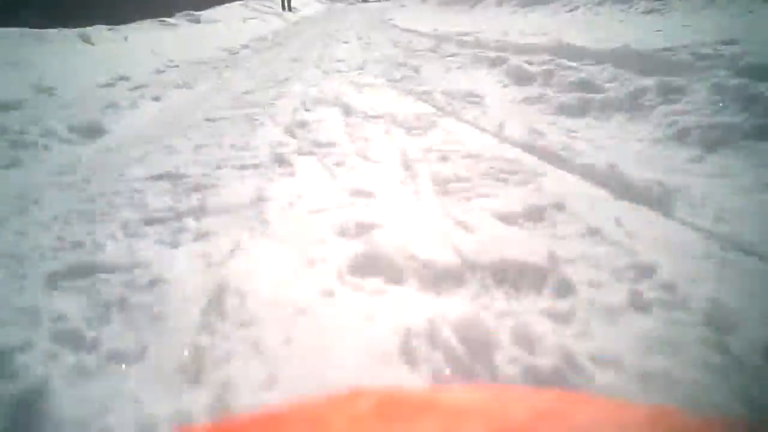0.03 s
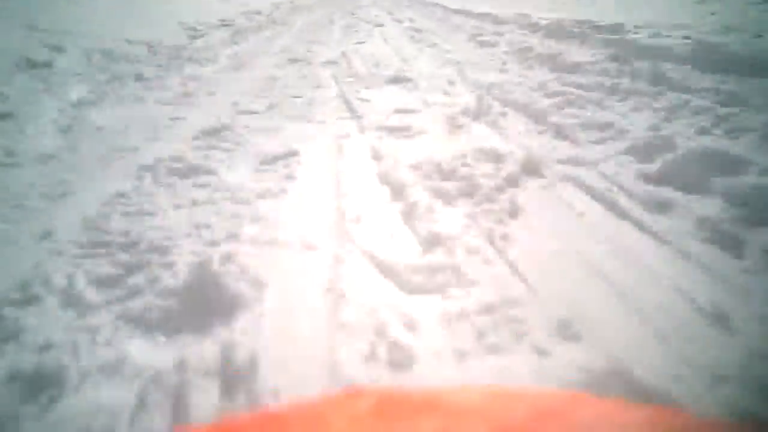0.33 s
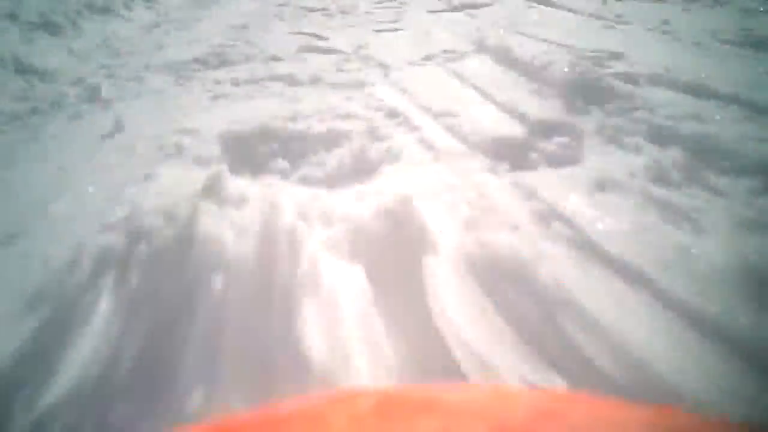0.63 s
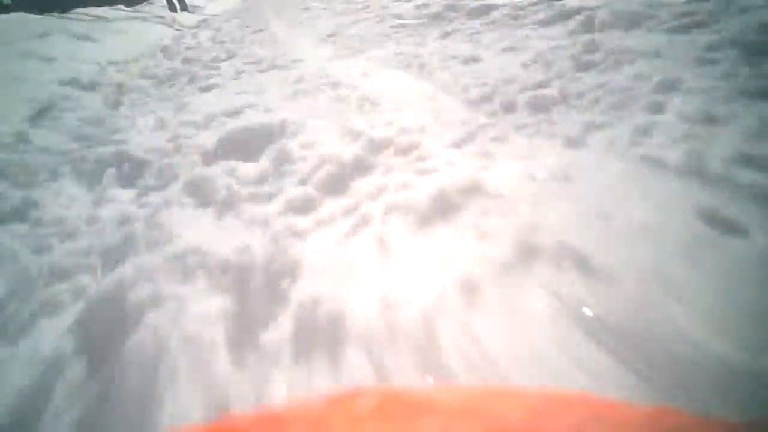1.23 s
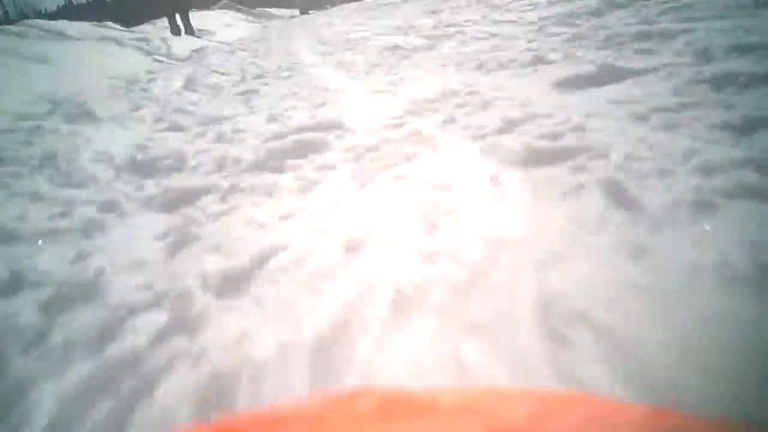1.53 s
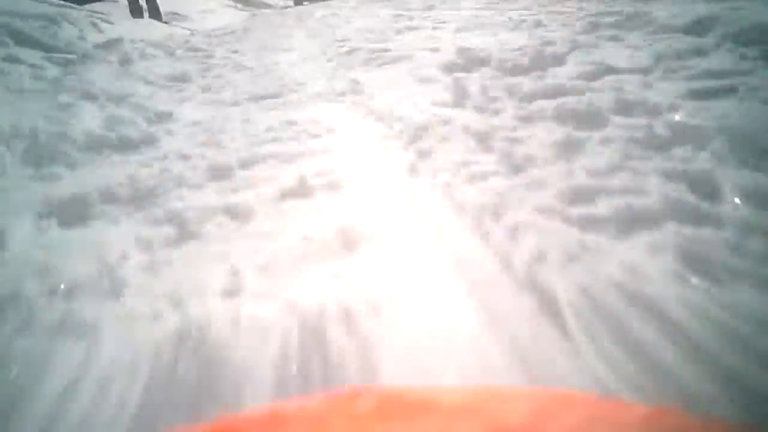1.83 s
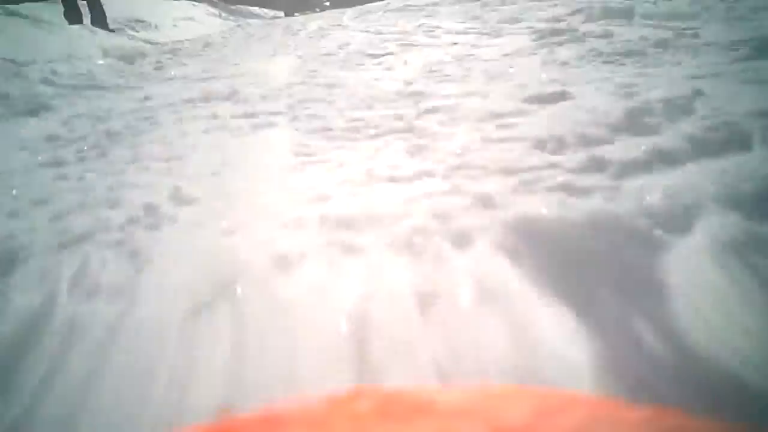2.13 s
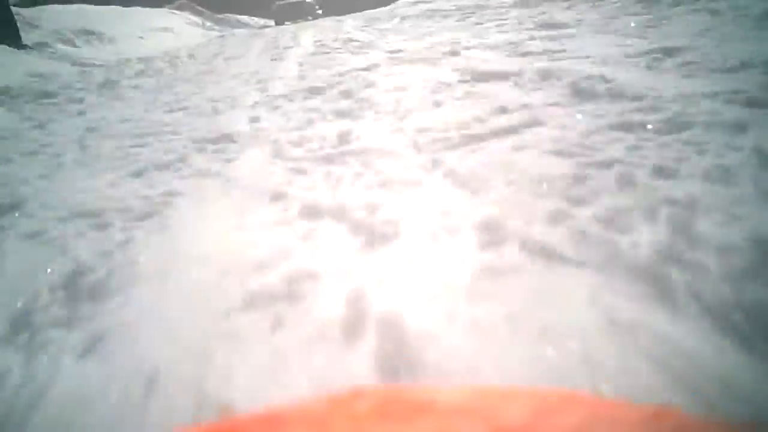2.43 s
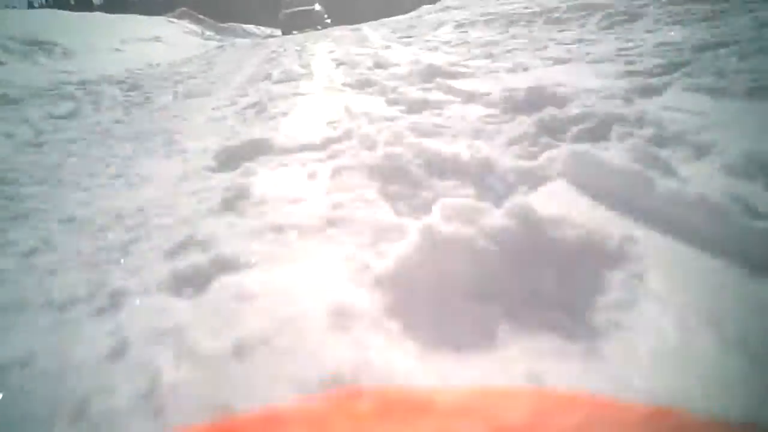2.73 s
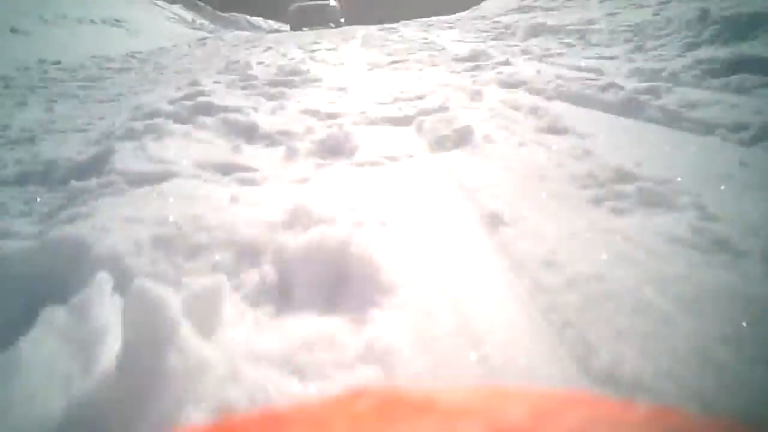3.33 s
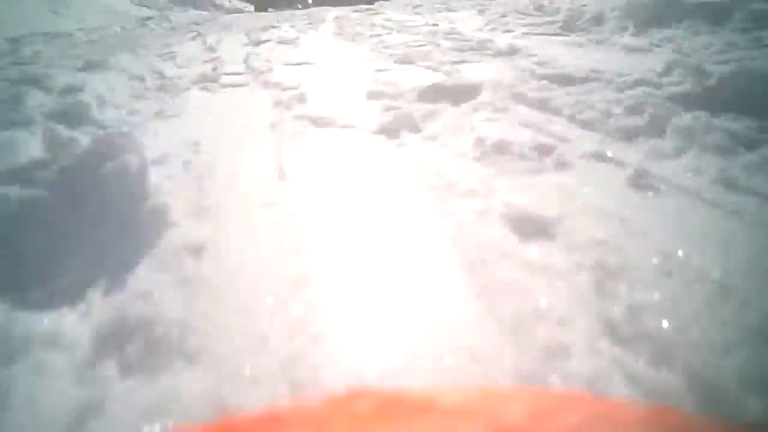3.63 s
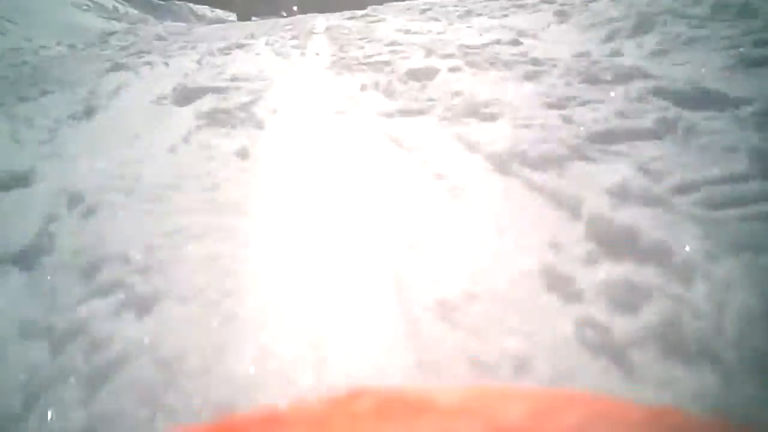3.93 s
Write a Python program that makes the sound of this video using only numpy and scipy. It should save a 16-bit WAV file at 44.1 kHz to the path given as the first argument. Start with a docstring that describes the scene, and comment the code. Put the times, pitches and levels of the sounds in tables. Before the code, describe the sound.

A model aircraft scrapes over rough snow, heard from its hull. At first there is only rushing wind with a fluttering whistle and low buffeting. From about 0.7 seconds the belly strikes ridges in short gritty scrapes, with crust cracks, hollow ticks and small knocks. The wind sinks in pitch and fades by 3.5 seconds. From around 2.3 seconds a light glide builds, ticking and bumping until 4 seconds.

```python
"""A light model aircraft skims over rough snow, heard from its hull.
Wind rushes past with a fluttering, whistling upper edge that sinks in pitch as it fades. The belly
strikes ridges in short gritty scrapes that crack the crust, then settles into a steady glide.
Hard crumbs tick on the hollow hull and the bigger bumps set the airframe ringing."""
import sys
import numpy as np
from scipy import signal
from scipy.fft import rfft, irfft, next_fast_len
from scipy.io import wavfile
from scipy.ndimage import uniform_filter1d, map_coordinates

SR = 44100
rng = np.random.default_rng(int(sys.argv[2]) if len(sys.argv) > 2 else 0)


def to_wav(s):
    """Save 16-bit WAV."""
    ch = np.atleast_2d(s).T  # columns
    pcm = np.round(np.clip(ch, -1, 1) * 32767)  # PCM
    wavfile.write(sys.argv[1], SR, pcm.astype(np.int16))


N = 176400
T = np.arange(N) / SR
CLUMPS_PER_S, CLUMP_DB = 160, 1

# snow hiss spectrum: freq_hz, gain_db
HISS_COLOUR = [(2000, -9), (3000, -2.5), (3500, -9), (4100, 0), (4600, 4.5), (5100, -5), (5600, -9.5),
               (6300, -3), (6800, -7), (7250, -1.5), (8000, -12.5), (8900, -16), (9650, -6.5),
               (10700, -10.5), (11500, -11), (13000, -12.5), (16000, -23)]


def amp(db):
    """Decibels to gain."""
    return 10 ** (np.asarray(db) / 20)


def unit(x):
    """Scale to rms 1."""
    return x / np.sqrt(np.mean(x ** 2) + 1e-20)


def log_curve(rows, freq):
    """Interpolate (freq, value) rows on a log axis."""
    knots, values = np.transpose(rows)
    return np.interp(np.log(freq + 1e-6), np.log(knots), values)


def curve(rows, t=T):
    """Interpolate (time_s, value) rows."""
    return np.interp(t, *np.transpose(rows))


def wobble(knots_per_s):
    """Smooth random curve."""
    return map_coordinates(rng.standard_normal(int(N * knots_per_s / SR) + 4), [T * knots_per_s])


def coloured(x, colour):
    """Minimum-phase filter from (freq_hz, gain_db) rows; output rms 1."""
    size = 2 * next_fast_len(N // 2 + SR // 8)
    gain = amp(log_curve(colour, np.fft.rfftfreq(size, 1 / SR)))
    cepstrum = irfft(np.log(gain))
    cepstrum[1:size // 2] *= 2
    cepstrum[size // 2 + 1:] = 0
    return unit(irfft(rfft(x, size) * np.exp(rfft(cepstrum)))[:N])


def add(out, start_s, sound):
    """Mix a sound in at start_s."""
    part = out[max(round(start_s * SR), 0):][:len(sound)]
    part += sound[:len(part)]


def wind():
    """A rush of wind with a fluttering, whistling upper edge that sinks in pitch as it fades."""
    # rush loudness: time_s, level_db
    loudness = [(0.0, -27), (0.36, -26.5), (1.17, -26), (1.53, -28.5), (2.42, -32.5), (2.97, -39.5),
                (3.1, -39.5), (3.59, -53), (4.0, -62.5)]
    # upper edge of the rush: time_s, freq_hz
    edge = [(0, 2850), (.7, 2790), (1.0, 2150), (1.4, 2050), (1.8, 1670), (2.15, 1560), (2.5, 1420),
            (2.8, 1340), (4, 1000)]
    # whistle over the rush: time_s, gain_db
    whistle = [(0, -5), (.6, 1), (1.0, -23), (1.5, 4.5), (2.1, 11.5), (2.8, 15.5), (3.2, -21), (4, -5)]
    # faint hiss above the edge: edge_ratio, gain_db
    skirt = [(1, -45), (1.5, -22), (2, -25), (3, -32.5), (5, -49.5), (12, -40)]
    hz, t, spectrum = signal.stft(rng.standard_normal(N), SR, nperseg=512)
    flutter = 1 + 0.025 * np.interp(t, T, wobble(30))
    edge_ratio = hz[:, None] / (curve(edge, t) * flutter)
    whistle_power = amp(curve(whistle, t)) ** 2 * np.exp(-.5 * ((edge_ratio - 1) / 0.038) ** 2)
    power = 1 / (1 + edge_ratio ** 9.9) + whistle_power + amp(log_curve(skirt, edge_ratio)) ** 2
    rush = signal.istft(spectrum * np.sqrt(power), SR, nperseg=512)[1][:N]
    return rush * amp(curve(loudness) + 0.8 * wobble(24.8))


def buffet():
    """Air buffets the microphone: low, unsteady noise."""
    # buffet strength: time_s, level_db
    strength = [(0, -44), (.33, -41), (.88, -54.5), (2.66, -49.5), (3.02, -50.5), (3.52, -50), (4, -52.5)]
    # buffet spectrum: freq_hz, gain_db
    colour = [(10, -5), (35, -3.5), (70, -5.5), (130, -1.5), (220, -3.5), (350, -12.5), (600, -27.5),
              (2000, -60)]
    return coloured(rng.standard_normal(N), colour) * amp(curve(strength) + 0.74 * wobble(15))


def ticks(pressure, crumbs_per_s=45, spread_db=21, crumble_s=0.00062, detune=0.02, gain_db=-5):
    """Hard crumbs break up on the hull and ring it; random extra ones scale with sliding pressure."""
    # crumb strikes: start_s, relative_db
    strikes = [(.7123, -10), (.7357, -7), (.8031, -11), (1.0925, -14.5), (1.1012, -10), (1.141, -16.5),
               (1.3365, -6), (1.356, -7), (1.416, -8), (1.447, -16), (1.843, -19), (1.934, -15),
               (1.9914, -12.5), (2.1775, -5), (2.1915, -17), (2.2289, -16), (2.2745, -26), (2.4753, -5),
               (2.4957, -19), (2.6235, -1.5), (2.6649, -11.5), (2.7866, -5.5), (2.8565, -15),
               (2.8889, -14.5), (2.9178, -6.5), (2.938, -17), (3.0083, -6), (3.0524, -6.5), (3.0714, -12),
               (3.0954, -8.5), (3.2553, -8.5), (3.3124, -10), (3.3992, -12), (3.4196, -12.5), (3.478, -4),
               (3.530, -11.5), (3.6392, 0.5), (3.7068, -9.5), (3.7175, -11), (3.7748, -17.5), (3.8255, -9),
               (3.8631, -15.5), (3.9544, -0.5), (3.965, -12)]
    # hollow hull response: freq_hz, gain_db
    ring_colour = [(300, -42), (1000, -27), (1280, -10.5), (1500, -8.5), (1800, 6), (2050, -2),
                   (2330, -4.5), (2520, -4.5), (2720, -12), (3000, -18), (3400, -40), (4200, -30),
                   (4650, -36), (5400, -33), (7200, -29), (9000, -37.5), (16000, -63)]
    out, n = np.zeros(N), np.arange(SR // 30)
    ring = coloured(signal.unit_impulse(N), ring_colour)[:len(n)]
    ring /= np.abs(ring).max()
    crumbs = []
    for start_s, size in rng.random((int(crumbs_per_s * T[-1]), 2)) * [T[-1], 1]:
        centre_db = 20 * np.log10(pressure[int(start_s * SR)] + 1e-9) + 2
        crumbs.append((start_s, centre_db + spread_db * (2 * size - 1)))
    for start_s, relative_db in list(strikes) + crumbs:
        blow = (n == 0) + 0.13 * rng.standard_normal(len(n)) * np.exp(-n / SR / crumble_s)
        detuned_ring = np.interp(n * (1 + detune * rng.standard_normal()), n, ring)
        tick = signal.fftconvolve(blow, detuned_ring)
        tick *= np.linalg.norm(ring) / np.linalg.norm(tick)
        add(out, start_s, amp(relative_db + gain_db) * tick)
    return out


def patchy(x, depth_db=1.7):
    """Each patch of snow has a slightly different colour."""
    spectrum = signal.stft(x, nperseg=256)[2]
    field = uniform_filter1d(rng.standard_normal(spectrum.shape), size=6, axis=0)
    field = uniform_filter1d(field, size=6, axis=1)
    return unit(signal.istft(spectrum * amp(depth_db * unit(field)), nperseg=256)[1][:N])


def grit(colour, rough_db, grains_per_s=5000, spread_db=2.5):
    """Dense snow grains break in clumps: filtered random impulses, rms 1."""
    breaks = rng.random(N) < grains_per_s / SR
    grain_db = spread_db * np.minimum(rng.exponential(size=N), 3) + rough_db * wobble(260)
    grains = breaks * amp(grain_db) * rng.choice([-1, 1], N)
    return coloured(patchy(grains), colour)


def ridge_contact(attack_s=0.0017, release_s=0.0063, fade_db=3.5):
    """Hull, hiss and rumble envelopes: the belly hits each ridge, easing until lift-off."""
    # ridge hits: start_s, length_s, hull_db, hiss_db, rumble_db
    ridges = [(0.713, 0.014, -22, -26, -27.5), (0.7345, 0.0072, -26, -27.5, -24.5),
              (0.757, 0.004, -19.5, -28, -27), (0.767, 0.0086, -31, -40, -47),
              (0.778, 0.023, -29, -34, -40), (1.0756, 0.0072, -17.5, -27.5, -28),
              (1.098, 0.0073, -18.5, -24, -29), (1.134, 0.04, -44, -48, -62),
              (1.342, 0.012, -18, -26.5, -33.5), (1.36, 0.0093, -24.5, -28.5, -30.5),
              (1.416, 0.02, -28.5, -40, -37.5), (1.48, 0.0077, -25, -39, -40),
              (1.578, 0.026, -33.5, -54, -45), (1.619, 0.048, -27, -36.5, -36),
              (1.675, 0.06, -30.5, -38.5, -54), (1.8365, 0.063, -27.5, -37.5, -47),
              (1.917, 0.035, -29.5, -44, -60), (1.985, 0.025, -28, -39.5, -39.5),
              (2.021, 0.027, -27, -39, -52), (2.177, 0.0079, -24, -35, -32), (2.272, 0.05, -28, -39, -59),
              (2.294, 0.017, -24.5, -31.5, -35.5), (2.405, 0.019, -31.5, -43, -45),
              (2.452, 0.018, -28.5, -42, -57), (2.4947, 0.0074, -16.5, -30, -33),
              (2.617, 0.013, -22, -32.5, -32), (2.656, 0.019, -36, -45.5, -40.5),
              (2.784, 0.0046, -30, -34.5, -30.5), (2.797, 0.014, -19.5, -33.5, -30),
              (2.898, 0.036, -32, -39, -40), (3.05, 0.034, -32.5, -38.5, -44),
              (3.15, 0.019, -27, -30.5, -32.5), (3.16, 0.061, -34, -40, -48),
              (3.238, 0.016, -31, -38, -42.5), (3.2552, 0.012, -23.5, -26.5, -33),
              (3.272, 0.042, -36, -44, -44.5), (3.384, 0.033, -36, -39.5, -69),
              (3.476, 0.0075, -21, -27, -37), (3.638, 0.0032, -24.5, -31, -33),
              (3.668, 0.012, -35, -44.5, -62), (3.739, 0.011, -30.5, -38.5, -47),
              (3.829, 0.03, -38.5, -44, -56), (3.954, 0.0044, -21.5, -27, -34)]
    power = np.zeros((3, N))
    for start_s, length_s, *levels_db in ridges:
        near = slice(int((start_s - .03) * SR), int((start_s + length_s + .06) * SR))
        t = T[near] - start_s
        shape = np.exp(np.minimum(t, 0) / attack_s - np.maximum(t - length_s, 0) / release_s)
        fade = amp(fade_db * (.5 - np.clip(t / length_s, 0, 1)))
        power[:, near] += (amp(levels_db)[:, None] * shape * fade) ** 2
    return np.sqrt(power) * unit(amp(CLUMP_DB * wobble(CLUMPS_PER_S)))


def scrapes():
    """Snow grinds along the belly at each ridge."""
    # scraped hull spectrum: freq_hz, gain_db
    hull_colour = [(300, -24.5), (600, -29), (900, -5.5), (1300, 1.5), (1580, 5.5), (1820, 4), (2100, 0),
                   (2700, -10.5), (3300, -17.5), (5000, -58.5)]
    # rumble spectrum: freq_hz, gain_db
    rumble_colour = [(30, -23.5), (100, -9.5), (170, -4), (260, 5.5), (380, -4.5), (550, -6.5), (800, -7),
                     (1200, -3), (2500, -66)]
    hull, hiss, rumble = ridge_contact()
    return (amp(-2) * hull * grit(hull_colour, rough_db=1.8)
            + amp(-1.5) * hiss * grit(HISS_COLOUR, rough_db=1.6)
            + amp(-1) * rumble * grit(rumble_colour, rough_db=1.5))


def bumps(attack_s=0.00029, roughness=0.46):
    """Each bump rings one part of the airframe, briefly and unevenly."""
    # airframe knocks: start_s, level_db, pitch_hz, t60_s
    knocks = [(0.722, -12, 1390, 0.019), (.736, -10, 1920, 0.036), (0.7361, -24, 218, 0.085),
              (1.082, -15, 1800, .035), (1.098, -11.5, 1806, 0.035), (1.358, -20.5, 266, 0.076),
              (1.36, -30, 115, 0.13), (1.4816, -16.5, 1316, 0.02), (2.178, -20.5, 188, 0.063),
              (2.787, -4, 1390, 0.0088), (2.806, -7.5, 1400, 0.0088), (3.152, -2, 1440, 0.0074),
              (3.2562, -14, 764, 0.019), (3.954, -27.5, 170, 0.05)]
    out, t = np.zeros(N), T[:SR // 8]
    for start_s, level_db, pitch_hz, t60_s in knocks:
        drift_rad = roughness * np.cumsum(rng.standard_normal(len(t))) * np.sqrt(pitch_hz / SR)
        envelope = amp(level_db - 60 * t / t60_s) * (1 - np.exp(-t / attack_s))
        add(out, start_s, envelope * np.sin(2 * np.pi * pitch_hz * t + drift_rad))
    return out


def cracks(t60_s=0.018):
    """Plates of crust snap under the belly: short, bright sprays of grains."""
    # crust snaps: start_s, level_db
    snaps = [(0.7793, -17), (1.077, -13), (1.3368, -12), (1.3543, -12), (1.4072, -26), (1.581, -30),
             (1.625, -22.5), (1.6608, -17), (1.841, -16.5), (2.024, -17), (2.495, -19), (2.6215, -18.5),
             (3.157, -15.5), (3.266, -14), (3.481, -16)]
    envelope, t = np.zeros(N), T[:SR // 30]
    for start_s, level_db in snaps:
        add(envelope, start_s, amp(level_db - 60 * t / t60_s))
    spray = grit(HISS_COLOUR, rough_db=-1)
    return envelope * spray / np.percentile(np.abs(spray), 99)


def glide_pressure(gain_db=-1.4, wander_db=2.5):
    """Sliding contact, lighter over hollows and short hops."""
    # belly load: time_s, relative_db
    load = [(1.3, -54), (1.39, -48), (1.46, -48), (1.52, -60), (1.8, -56), (2.1, -56.5), (2.16, -50),
            (2.25, -54), (2.32, -42), (2.51, -42.5), (2.57, -45.5), (2.67, -42.5), (2.77, -46.5),
            (2.87, -44), (2.97, -38.5), (3.005, -55), (3.03, -61), (3.06, -36), (3.125, -43), (3.2, -39),
            (3.33, -38.5), (3.4, -40.5), (3.44, -42), (3.48, -37), (3.58, -36.5), (3.61, -48.5),
            (3.645, -40), (3.682, -36), (3.696, -54.5), (3.712, -51), (3.735, -37.5), (4, -39.5)]
    return amp(curve(load) + gain_db + wander_db * wobble(35) + CLUMP_DB * wobble(CLUMPS_PER_S))


def glide(pressure):
    """Light sliding over the crust excites mostly the hull's resonances."""
    # sliding spectrum: freq_hz, gain_db
    colour = [(100, -31), (250, -13), (550, -30), (850, -17), (1150, -10.5), (1500, -6.5), (1830, 0),
              (2100, -5), (2400, -11), (3000, -12), (3500, -28), (4100, -17), (4650, -13), (5600, -24),
              (6400, -19), (7300, -21), (8600, -30), (9700, -26.5), (12500, -28), (16000, -36)]
    return pressure * grit(colour, rough_db=3.0)


def scene():
    """Air and snow contact, mono."""
    air = wind() + buffet()
    pressure = glide_pressure()
    return (air + glide(pressure) + ticks(pressure) + scrapes() + bumps() + cracks())[None]


def record(dry):
    """Brick-wall low-pass."""
    cutoff_hz = 15850
    size = next_fast_len(N + SR // 4)
    passband = np.fft.rfftfreq(size, 1 / SR) < cutoff_hz
    return irfft(rfft(dry, size) * passband, size)[..., :N]


dry = scene()
out = record(dry)
to_wav(out)
```